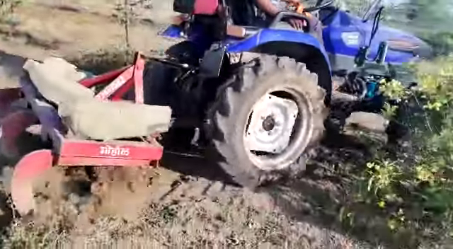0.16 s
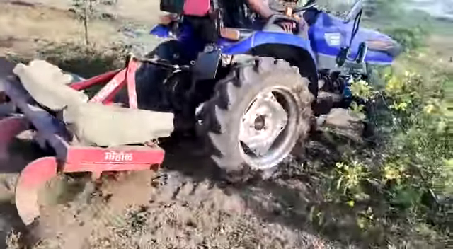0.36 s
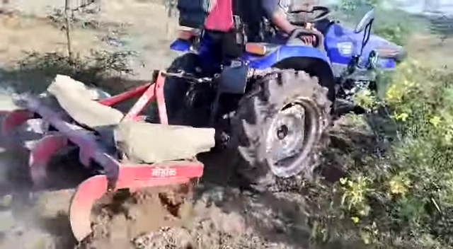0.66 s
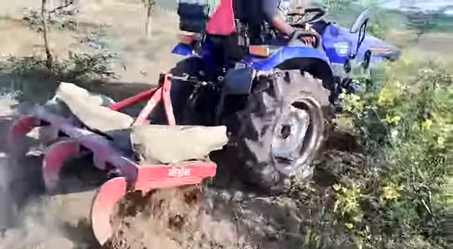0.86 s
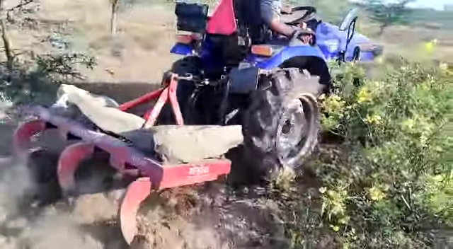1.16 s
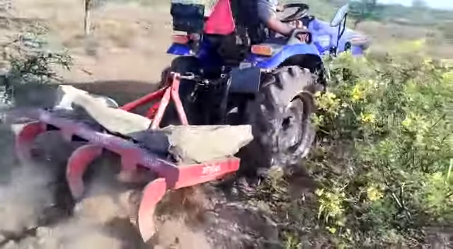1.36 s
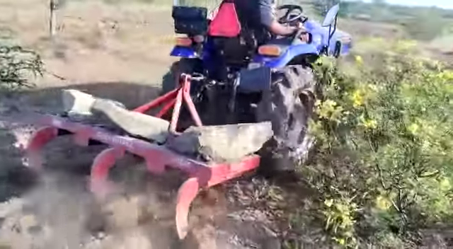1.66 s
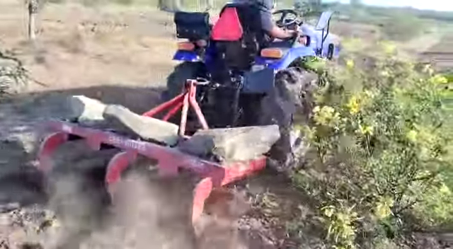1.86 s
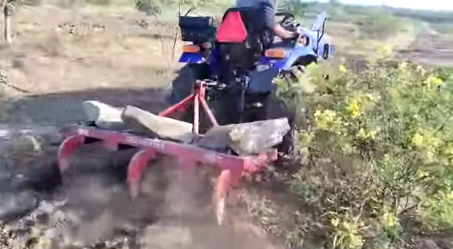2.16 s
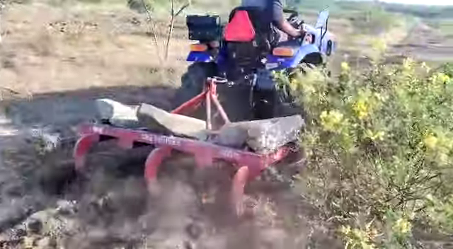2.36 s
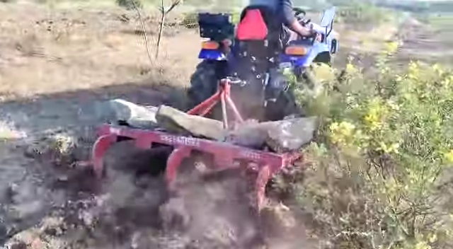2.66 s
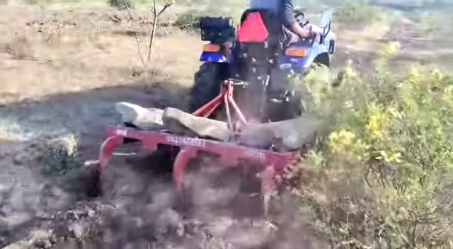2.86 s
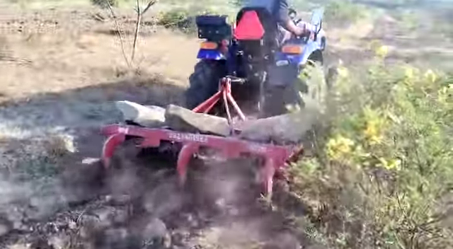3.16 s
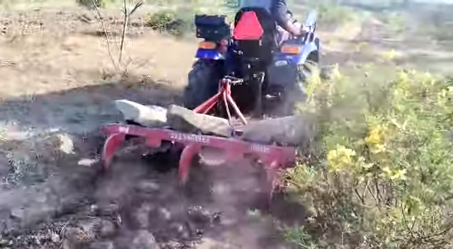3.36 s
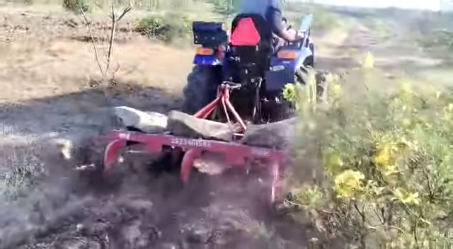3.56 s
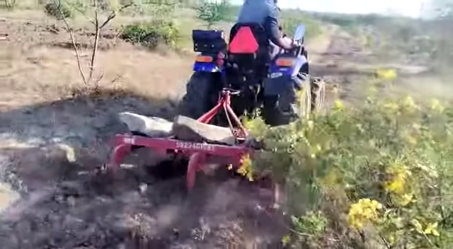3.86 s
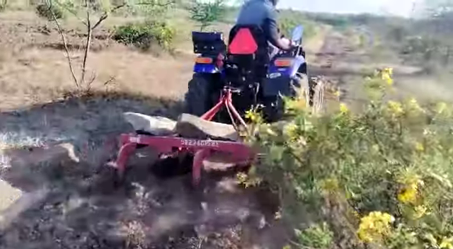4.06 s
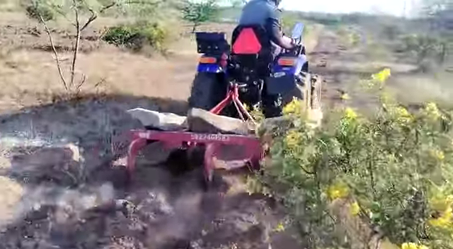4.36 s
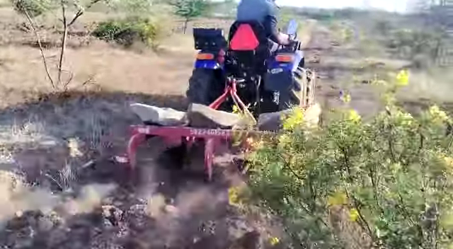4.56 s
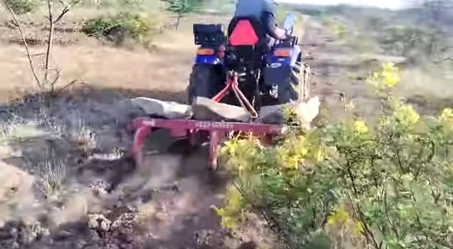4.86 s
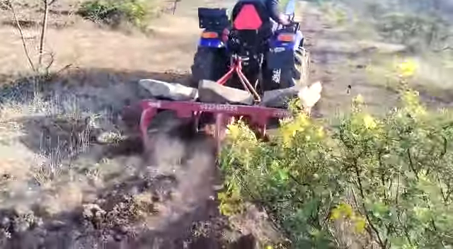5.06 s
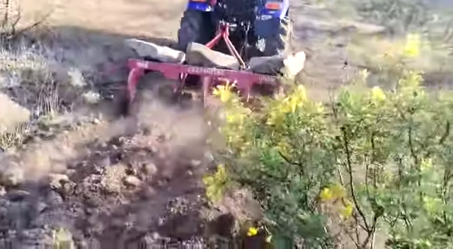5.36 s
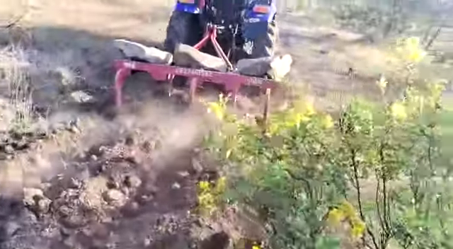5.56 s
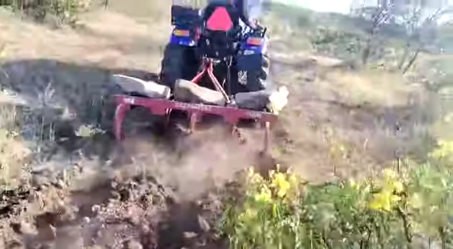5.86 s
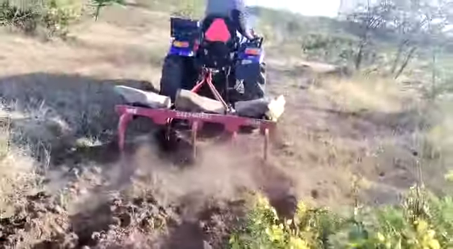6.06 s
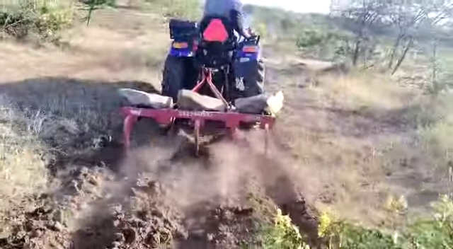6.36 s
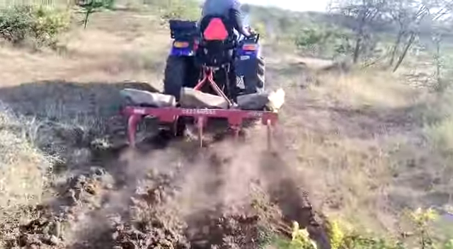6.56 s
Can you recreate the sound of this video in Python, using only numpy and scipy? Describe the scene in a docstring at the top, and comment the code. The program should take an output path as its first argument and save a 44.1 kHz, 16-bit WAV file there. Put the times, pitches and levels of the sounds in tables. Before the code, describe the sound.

Steady diesel chugging with whining gears and metallic rattle draws off across a dry field, with clanking steel, tumbling clods, a bush swish and snapping twigs.

```python
"""Open field, dry soil and scrub: a small diesel tractor starts abreast, 1.92 m off, and drives away with a tine harrow.
From the first second its exhaust beats once a crank turn under gear whine and clatter, while noise and grains
make soil hiss and tumble; the frame first clanks at 0.7 s, as struck modes, and the flank turns away near 2 s.
A bush swishes past at 3.49 s as cracks of twigs and clods, short grain bursts, crowd in; tines scrape stones as
ringing slips from 4.0 to 4.9 s; thumps, damped low notes, come from 1.2 s on, and the frame rattles near 6.06 s."""
import sys
import numpy as np
from scipy import signal
from scipy.fft import rfft, irfft
from scipy.io import wavfile

SR = 44100
rng = np.random.default_rng(int(sys.argv[2]) if len(sys.argv) > 2 else 0)


def waveform_to_disk(signal):
    """Save audio, clipped to [-1, 1], as 16-bit WAV at the path in sys.argv[1]."""
    frames = np.transpose(np.atleast_2d(signal))
    scaled = np.clip(frames, -1, 1) * 32767
    samples = np.round(scaled).astype(np.int16)
    wavfile.write(sys.argv[1], SR, samples)


N = 295470
TIME = np.arange(N) / SR  # s
BINS = np.fft.rfftfreq(N, 1 / SR)  # Hz

# Crank speed, sagging under load. Each row: time in seconds, speed in turns per second.
CRANK_SPEED = [(0.0, 34.45), (0.28, 34.95), (0.53, 35.15), (0.8, 34.1), (0.89, 35.03), (1.15, 34.52),
               (1.35, 34.52), (1.51, 34.2), (1.75, 34.7), (2.14, 35.17), (2.6, 34.9), (2.91, 34.27),
               (3.17, 36.08), (3.42, 35.97), (3.6, 35.56), (3.98, 35.17), (4.06, 33.95), (4.24, 34.0),
               (4.41, 33.5), (4.7, 35.2), (5.21, 35.7), (5.52, 34.74), (5.78, 35.79), (6.18, 34.92),
               (6.45, 35.31), (6.7, 34.85)]
# Engine effort: the governor feeds more fuel as the tines bite. Each row: time in seconds, effort in dB.
ENGINE_EFFORT = [(0, 3), (0.55, -1.5), (0.88, 2.5), (1.06, -3.5), (1.6, 2.5), (2.0, -1.5), (2.45, 0),
                 (3.17, 4), (3.55, 4), (3.92, -2), (4.25, 4), (4.85, 4.5), (5.35, -1), (6.0, -0.5),
                 (6.7, 1)]
# The tractor drives straight off; its flank turns out of sight on the way.
NEAR_M, DRIVE_M_PER_S = 1.92, 0.92
TURN_AWAY_S, TURN_LENGTH_S = 1.97, 0.077
# How a layer carries over the field. Each holds: base level in dB, change in dB per doubling of distance,
# extra level side-on in dB, change in dB per dB of effort.
NOTE_LAW = (-32, 0, 0.36, 0.5)
ROAR_LAW = (-30.5, -2.5, 0.45, 0)
CLATTER_LAW = (-32, -2, 0.3, 0.2)
CRUMBS_LAW = (-43, -3, 1, 0.5)
CLODS_LAW = (-47.5, -7, 9.5, -0.5)

# Exhaust pipe colour. Each row: multiple of the mean crank speed, relative level in dB.
EXHAUST_PIPE = [(1, -28.5), (2, -10), (3, -6.5), (4, -0.5), (5, -4.5), (6, -21), (7, -6.5), (8, -10),
                (9, -10.5), (10, -16), (12, -26), (16, -26.5)]
# Strength of a booming exhaust resonance. Each row: time in seconds, gain in dB.
BOOM_GAIN = [(0, 1), (0.4, 3.5), (0.58, 0), (0.83, 10), (1.1, 2), (1.75, 7.5), (2.1, -12), (2.9, 3),
             (3.5, -3.5), (3.9, -16), (4.3, 1.5), (5.0, -24), (5.9, -31), (6.3, -5), (6.7, -17)]
BOOM_HZ, BOOM_WIDTH_HZ = 243, 18
# Spectrum of the exhaust gas. Each row: frequency in Hz, relative density in dB per Hz.
ROAR_SPECTRUM = [(20, -29), (55, -18), (90, -10), (140, 0.5), (220, 3.5), (330, 0), (470, -0.5), (570, -4),
                 (700, -35), (1200, -65)]
# Spectrum of the engine rattle. Each row: frequency in Hz, relative density in dB per Hz.
CLATTER_SPECTRUM = [(400, -34.5), (630, -4.5), (790, -3), (900, 2.5), (1050, 1.5), (1220, -1.5), (1420, -4),
                    (1680, -9), (1950, -11.5), (2600, -22), (6000, -67)]
# Tones of each gear mesh and of the shafts. Each row: multiple of the crank speed, relative level in dB.
LOWER_MESH = [(25, 0), (24, -14)]
MIDDLE_MESH = [(25.47, 0), (26.1, -8), (24.5, -10)]
UPPER_MESH = [(28, 1), (29, -9.5), (27, -14), (12, -12), (42, -14)]
SHAFT_HUM = [(6.36, 0), (13.33, -5.5), (120.9, -24)]
HUM_DB = -43
# Whine of each mesh, swelling as its teeth take the load. Each row: time in seconds, level in dB.
LOWER_LOAD = [(0, -54), (0.45, -50), (0.55, -38), (1.3, -36.5), (1.7, -37.5), (1.95, -48), (2.35, -48),
              (2.5, -40), (2.62, -50), (3.15, -47), (3.3, -37), (3.55, -35.5), (3.85, -40), (4.0, -48),
              (4.75, -47), (4.87, -37), (5.1, -34.5), (5.5, -40), (5.9, -41), (6.4, -36.5), (6.7, -41)]
MIDDLE_LOAD = [(0, -50), (1.0, -46), (2.0, -41.5), (2.55, -42), (2.75, -35), (2.98, -40), (3.15, -33.5),
               (3.8, -37.5), (4.3, -42), (4.8, -37), (5.15, -37), (5.35, -46), (6.7, -45)]
UPPER_LOAD = [(0, -47), (0.25, -40), (0.6, -33), (0.82, -30), (1.1, -29.5), (1.4, -34.5), (1.7, -31.5),
              (2.0, -37), (2.35, -37), (2.7, -46), (2.95, -43), (3.15, -36), (3.5, -38), (3.9, -43),
              (4.6, -39.5), (5.25, -43), (5.47, -36.5), (5.8, -46), (6.3, -41), (6.7, -41)]
# Ringing of the gearbox case. Each row: frequency in Hz, half-width in Hz, relative level in dB.
CASING_MODES = [(1293, 20, -7), (1427, 46, -13.5)]
# Drone of the engine block. Each row: frequency in Hz, half-width in Hz, relative level in dB.
BLOCK_MODES = [(425, 39, -7), (544, 52, -7)]

# Ringing of the harrow frame. Each row: frequency in Hz, half-width in Hz, relative level in dB.
FRAME_MODES = [(900, 110, 11), (1030, 70, 13), (1230, 95, 12.5), (1750, 300, -7), (2675, 45, -3),
               (3185, 50, -2), (3450, 70, 6.5), (4240, 85, -1), (4660, 150, -2.5), (5320, 115, -2.5),
               (5900, 120, -15), (10700, 940, -18), (13000, 870, -26)]
# The frame jolts on its hitch. Each row: start in seconds, level in dB, chatter length in seconds, treble in dB,
# extra 4-7 kHz in dB, extra top click in dB, note of the struck link in Hz, its level in dB before a 3.5 dB cut,
# its overtone in Hz, overtone level in dB.
CLANKS = [(0.7385, -21.5, 0.015, 4.5, -4.5, -2, 1098, -8.5, 3490, -39),
          (1.5628, -21.5, 0.0091, 3.5, -6, 3.5, 1056, -9.5, 3460, -33),
          (2.515, -23, 0.019, 0.5, -5, 0.5, 1040, -35, 2690, -32),
          (4.135, -21.5, 0.014, 1.5, -1, 1, 956, -16, 3430, -34),
          (4.421, -24, 0.0077, -3, -2, -2, 970, -16, 4210, -37),
          (4.596, -21, 0.017, -2, 0, 1, 970, -25, 5200, -36),
          (4.8058, -19, 0.0091, -3, 7, 2, 956, -12, 5350, -36)]
TAIL_DB, TAIL_DECAY_S, TAIL_RAGGED_DB = -15, .035, 3.5
LINK_RISE_S, LINK_DECAY_S = .002, 0.01
# Twigs and clods break; near 6.06 s the frame rattles briefly. Each row: start in seconds,
# level in dB before colouring, decay time in seconds, hollowness (gain below 4 kHz) in dB,
# top treble in dB, left over right in dB, ring in Hz.
SNAPS_AND_RATTLE = [(0.885, -43.5, 0.046, 4.5, -13, -3, 5000), (1.395, -38.5, 0.044, 3, -9, 1, 4770),
                    (2.409, -44, 0.064, -5, -9, 0, 3270), (2.591, -42.5, 0.0034, 6, -6, 10, 1810),
                    (3.464, -27.5, 0.0047, -11, -5, -1, 5300), (3.502, -25, 0.0035, -3.5, -2, 0, 5270),
                    (3.616, -34, 0.012, -14, -2, -4, 5270), (3.7298, -23, 0.0023, -10, 0, -7, 5230),
                    (4.026, -45.5, 0.073, 1, -6, -3, 3400), (4.195, -40.5, 0.057, -6, -17, 4, 3400),
                    (4.849, -33, 0.004, -5, -16, 0, 3920), (4.972, -41.5, 0.0056, -5, 4, -6, 5300),
                    (5.120, -40, 0.0035, -17, -6, -7, 5280), (5.169, -29, 0.001, -2.5, -16, 15, 1805),
                    (5.2366, -34.5, 0.0081, -20, 1.5, -5, 4760),
                    (5.3532, -19.5, 0.001, -7.5, -12, 21.5, 1880), (5.695, -48, 0.027, 2.5, -10, -7, 2490),
                    (5.780, -45, 0.00093, -9, 8, -15, 5300), (6.054, -36, 0.016, -2, -11, 0, 6000),
                    (6.068, -38, 0.015, -0.5, -21, -2, 5150), (6.283, -44, 0.0076, -11, 9, -3, 13400),
                    (6.564, -41, 0.0076, -4.5, -22, -3, 4260), (6.648, -43, 0.017, -2, -19, -4, 3400)]
# Spectrum of the snaps and the rattle. Each row: frequency in Hz, gain in dB.
SNAP_SPECTRUM = [(600, 3), (1500, 9.5), (3000, 6), (4200, 6), (5300, 2.5), (6300, -5), (7300, -12.5),
                 (9000, -9), (11200, 1.5), (14000, -15), (16000, -22)]
SNAP_RING_DB, SNAP_RING_WIDTH_HZ = 6.5, 130
GRIT_PER_S, GRIT_SHARE, CRACKLE_DB = 800, .65, 3.5
FIRST_CRACK_S = 0.0011  # the shorter the decay, the more the first crack stands out
# Clods bump the frame. Each row: start in seconds, level in dB, pitch in Hz, decay time in seconds.
THUMPS = [(1.203, -18, 320.2, 0.0091), (1.573, -24, 348, 0.029), (2.638, -18, 350, 0.0079),
          (3.135, -20, 322, 0.022), (4.88, -26.5, 312, 0.041), (5.455, -22, 337, 0.016),
          (5.727, -21, 367, 0.014)]
# Ringing of a tine. Each row: frequency in Hz, half-width in Hz, relative level in dB.
TINE_MODES = [(1240, 50, 1), (1890, 115, -2), (2900, 140, -18), (3380, 110, -15), (4220, 170, -8.5),
              (5100, 350, -19)]
# The tine scrapes over stones. Each row: start in seconds, length in seconds, peak pressure in dB.
SCRAPES = [(4.007, 0.083, -38.5), (4.173, 0.14, -36.5), (4.297, 0.14, -44), (4.465, 0.1, -30.5),
           (4.687, 0.23, -42)]
SQUEAL_S, SQUEAL_LENGTH_S, SQUEAL_DB = 4.515, 0.013, -39
SQUEAL_HZ, SQUEAL_WIDTH_HZ = 4135, 45

# Spectrum of sliding crumbs. Each row: frequency in Hz, relative density in dB per Hz.
CRUMB_SPECTRUM = [(600, -16.5), (1700, 7.5), (2400, -0.5), (2800, 9.5), (3450, 6.5), (3750, 7), (4200, 8),
                  (5300, 3.5), (6100, -3), (7000, -20), (9000, -17), (11000, -9), (13000, -20),
                  (15000, -51), (16000, -44)]
# Spectrum of rolling clods. Each row: frequency in Hz before the pitch ratio, relative density in dB per Hz.
CLOD_SPECTRUM = [(700, -8.5), (1100, 0.5), (1450, 6.5), (1700, -8.5), (2000, 1), (2400, -8), (3200, -8),
                 (4200, -22), (7000, -53.5)]
CRUMBS_PER_S, CRUMB_SPREAD_DB = 600, 2.5
# Swells of heaved soil; at 3.49 s a bush swishes past, hiss only. Each row: peak in seconds,
# half-length in seconds, tumble of clods in dB, hiss in dB, pitch of the tumble as a ratio.
SWELLS = [(0.171, 0.5, -33, -54, 1.026), (1.48, 0.11, -31, -52, 1.05), (2.752, 0.11, -42.5, -65, 1.09),
          (3.49, 0.18, -73, -44.5, 0.88), (4.231, 0.063, -44, -54, 1), (4.532, 0.32, -45, -49.5, .93),
          (5.261, 0.17, -43, -46, 0.96), (5.868, 0.26, -44.5, -76, 1.02)]
# Lowest pitch that the ground echo weakens. Each row: time in seconds, frequency in Hz.
GROUND_DIP = [(0, 694), (1.7, 654), (2.3, 576), (3.2, 568), (4.0, 596), (5.05, 560), (5.55, 655),
              (6.0, 690), (6.7, 570)]
# Likeness of the two microphone ports. Each row: frequency in Hz, left-right correlation from -1 to 1.
PORT_LIKENESS = [(60, 0.93), (400, 1), (900, 0.88), (1400, 0.84), (2300, -0.4), (6000, -0.0096),
                 (15000, 0.054)]
CROSSOVER_HZ, OVERLAP_HZ, TREBLE_LEAD_S = 6450, 520, .00513
EDGE_HZ = 15650


def exhaust(turns):
    """One pressure pulse a turn rings the pipe; no two firings are equally strong."""
    multiple, db = np.transpose(EXHAUST_PIPE)
    pipe_hz = multiple * np.mean(curve(CRANK_SPEED))
    pipe = causal(read(np.column_stack([pipe_hz, db]), BINS))
    pulses = -sum(np.cos(2 * np.pi * k * (turns - .045)) for k in range(1, 17))
    note = unit(shaped(pulses * amp(0.5 * wander(29)), pipe))
    resonance = np.exp(-((BINS - BOOM_HZ) / BOOM_WIDTH_HZ) ** 2)
    boom = shaped(note, resonance) * amp(curve(BOOM_GAIN))
    return (note + boom) * loudness(*NOTE_LAW)


def roar(turns):
    """Turbulent gas puffs out with each pulse, some puffs harder than others."""
    burst = np.exp(-((turns + .02) % 1) / .17) * amp(3 * wander(30))
    puffs = rng.standard_normal((2, N)) * (1 + .4 * burst)
    return unit(shaped(ports(puffs), amp(read(ROAR_SPECTRUM, BINS)))) * loudness(*ROAR_LAW)


def clatter(turns):
    """Valve gear and injection rattle the block in step with the crank."""
    knocks = grains(per_s=1400, spread_db=-1.0) + 0.76 * rng.standard_normal((2, N))
    knocks *= throb(turns, at=0.72, depth_db=0.6)
    sound = unit(shaped(ports(knocks), causal(read(CLATTER_SPECTRUM, BINS))))
    return sound * loudness(*CLATTER_LAW) * amp(1.23 * wander(11.0))


def gears(turns, mesh, load_db, backlash, flutter_db):
    """Meshing teeth whine at multiples of the crank speed; backlash (in turns) blurs the high tones most."""
    shaft = turns + backlash * wander(10)
    tones = np.zeros(N)
    for multiple, db in mesh:
        level = amp(db + flutter_db * wander(33))
        tones += level * np.sin(2 * np.pi * (multiple * shaft + rng.random()))
    return np.sqrt(2) * tones * amp(load_db)


def casing():
    """Tooth rattle rings the gearbox case with the upper mesh's load, loudest while the flank faces us."""
    ring = unit(shaped(rng.standard_normal(N), body(CASING_MODES)))
    return ring * np.hypot(amp(curve(UPPER_LOAD) - 18.5), amp(-43.5) * side_on())


def block():
    """The engine block drones in its modes, fading from the start as the big wheel hides it."""
    drone = unit(shaped(rng.standard_normal(N), body(BLOCK_MODES)))
    return drone * amp(-29.5) * np.exp(-TIME / 0.45)


def clanks():
    """Loose steel strikes once and chatters; the frame rings and the struck link adds a note and overtone."""
    frame, out, links = body(FRAME_MODES), np.zeros((2, N)), np.zeros((2, N))
    treble = np.clip(BINS / 1500 - 1, 0, 1)
    high = np.interp(BINS, [3600, 4600, 6500, 8000], [0, 1, 1, 0])
    click = np.interp(BINS, [6500, 8000], [0, 1])
    age = TIME[:SR // 6]
    bounces = amp(TAIL_DB + TAIL_RAGGED_DB * wander(110))
    for s, db, length, treble_db, high_db, click_db, link_hz, link_db, over_hz, over_db in CLANKS:
        tail = bounces[round(s * SR):][:len(age)] * np.exp(-age / TAIL_DECAY_S)
        chatter = (np.exp(-(age / length) ** 4) + tail) * rng.standard_normal((2, len(age)))
        chatter /= np.linalg.norm(chatter, axis=1, keepdims=True)
        strike = [[.5], [0]] * (age == 0)  # only in the part that both ports share
        colour = amp(treble_db * treble + high_db * high + click_db * click)
        ring = short_filter(chatter + strike, frame * colour)
        ring /= np.linalg.norm(ring, axis=1, keepdims=True)
        add(out, s, ring * np.sqrt(length * SR) * amp(db))
        add(links, s, amp(link_db - 3.5) * struck(link_hz, LINK_RISE_S, LINK_DECAY_S))
        overtone = amp(over_db) * struck(over_hz, LINK_RISE_S, LINK_DECAY_S)
        add(links, s, placed(overtone, left_db=-1))
    lean_right = amp((treble - .8 * click) * np.array([[-2.7], [2.7]]))
    return shaped(ports(out), lean_right) + links


def snaps_and_rattle():
    """A crack and a burst of tiny ones ring a breaking twig (bright) or clod (hollow), or rattle the frame."""
    out = np.zeros((2, N))
    # doubled end to end, so that late bursts find enough of it
    crackle = np.tile(amp(CRACKLE_DB * wander(330)), 2)
    grit = np.tile(grains(per_s=GRIT_PER_S, spread_db=1.5), 2)
    lead_in = .01  # s of silence ahead of the crack
    age = TIME[:SR // 5] - lead_in
    for s, db, decay, hollow_db, top_db, pan_db, ring_hz in SNAPS_AND_RATTLE:
        start = round(s * SR)
        burst = (1 - GRIT_SHARE) * rng.standard_normal((2, len(age)))
        burst += GRIT_SHARE * grit[:, start:][:, :len(age)]
        burst *= np.exp(-abs(age) / decay) * (age >= 0)
        burst *= crackle[start:][:len(age)]
        burst /= np.linalg.norm(burst, axis=1, keepdims=True)
        burst[:, round(lead_in * SR)] += FIRST_CRACK_S / decay
        burst *= np.sqrt(decay * SR / 2) / np.linalg.norm(burst, axis=1, keepdims=True) * amp(db)
        colour = np.interp(BINS, [3500, 4800, 6000, 7000], amp([hollow_db, 0, 0, top_db]))
        colour *= 1 + amp(SNAP_RING_DB) / (1 + ((BINS - ring_hz) / SNAP_RING_WIDTH_HZ) ** 2)
        add(out, s - lead_in, placed(short_filter(burst, colour), pan_db))
    return amp(2.5) * shaped(out, causal(read(SNAP_SPECTRUM, BINS)))


def thumps():
    """Heavy clods bump the frame with a dull, short note."""
    out = np.zeros((2, N))
    for s, db, hz, decay in THUMPS:
        add(out, s, amp(db) * struck(hz, rise_s=0.0048, decay_s=decay))
    return out


def scrapes():
    """Quick slips of steel on stone ring a tine, wavering as it bends; at the hardest push it squeals."""
    pressure = np.zeros(N)
    for s, length, db in SCRAPES:
        arch = np.sqrt(np.maximum(1 - (2 * (TIME - s) / length - 1) ** 2, 0))
        pressure += amp(db) * arch
    slips = ports(grains(per_s=600, spread_db=1.0))
    squeal = unit(shaped(slips, body([(SQUEAL_HZ, SQUEAL_WIDTH_HZ, 0)])))
    squeal *= np.exp(-((TIME - SQUEAL_S) / SQUEAL_LENGTH_S) ** 2)
    ring = unit(shaped(slips, body(TINE_MODES))) * pressure + squeal * amp(SQUEAL_DB)
    bent = TIME + .00008 * wander(30)  # uneven reading of time wavers the pitch
    return np.array([np.interp(bent, TIME, port) for port in ring]) * amp(1.0 * wander(70))


def soil_and_bush(turns):
    """Dry crumbs slide and larger clods tumble, shaken by the engine's beat; a bush swells the hiss once."""
    tumble_swells, hiss_swells = swells()
    crumbs = rng.standard_normal((2, N)) + 0.5 * grains(per_s=CRUMBS_PER_S, spread_db=CRUMB_SPREAD_DB)
    hiss = unit(shaped(ports(crumbs), causal(read(CRUMB_SPECTRUM, BINS)))) * amp(1.48 * wander(24))
    hiss *= np.hypot(loudness(*CRUMBS_LAW), hiss_swells)
    lumps = rng.standard_normal((2, N)) + 0.58 * grains(per_s=270, spread_db=0.0)
    tumble = unit(shaped(ports(lumps), causal(read(CLOD_SPECTRUM, BINS)))) * amp(2.0 * wander(21))
    # big clods knock lower than small ones: read the tumble slower or faster
    pace = np.cumsum(curve([(s, pitch) for s, *_, pitch in SWELLS])) / SR
    tumble = np.array([np.interp(pace % TIME[-1], TIME, port) for port in tumble])
    tumble *= np.hypot(loudness(*CLODS_LAW), tumble_swells)
    return (hiss + tumble) * throb(turns, at=0.52, depth_db=1.25)


def swells():
    """Gains of the tumble and the hiss, rising and falling smoothly with heaved soil or the passing bush."""
    s, length, *levels_db, _ = np.transpose(SWELLS)
    shapes = np.exp(-((TIME - s[:, None]) / length[:, None]) ** 2)
    return amp(levels_db) @ shapes


def ground(x):
    """The ground echo weakens one pitch and its third multiple; the dips glide as the path changes."""
    dip_hz = curve(GROUND_DIP)
    lowest_dip = notch(x, dip_hz, width_hz=146, floor_db=-9.0)
    return notch(lowest_dip, 3 * dip_hz, width_hz=430, floor_db=-5.5)


def side_on():
    """1 while the flank of the tractor faces the listener, 0 once it has turned away."""
    return (1 - np.tanh((TIME - TURN_AWAY_S) / TURN_LENGTH_S)) / 2


def loudness(base_db, distance_db, side_db, effort_share):
    """Gain of a layer, set by its distance, the flank's facing and the engine's effort."""
    doublings = np.log2(np.hypot(NEAR_M, DRIVE_M_PER_S * TIME) / NEAR_M)
    facing_db = side_db * side_on()
    return amp(base_db + distance_db * doublings + facing_db + effort_share * curve(ENGINE_EFFORT))


def ports(pair):
    """Two microphone ports hear nearly the same bass, partly opposed sound near 2.3 kHz, unrelated treble."""
    same = np.clip(read(PORT_LIKENESS, BINS), -1, 1)
    mid = shaped(pair[0], np.sqrt((1 + same) / 2))
    side = shaped(pair[1], np.sqrt((1 - same) / 2))
    return np.array([mid + side, mid - side])


def placed(x, left_db):
    """Leans a sound left, or right if negative, by a level difference between the ports."""
    return x * amp([[left_db / 2], [-left_db / 2]])


def grains(per_s, spread_db):
    """Tiny impacts at random moments, their sizes spread by chance, scaled to rms 1."""
    size = amp(spread_db * np.minimum(rng.exponential(1, (2, N)), 4))
    sign = rng.choice([-1, 1], (2, N))
    return unit(size * sign * (rng.random((2, N)) < per_s / SR))


def struck(hz, rise_s, decay_s):
    """One damped mode, set going by a soft blow."""
    age = TIME[:SR // 5]
    swing = np.sin(2 * np.pi * hz * age)
    return swing * (1 - np.exp(-age / rise_s)) * np.exp(-age / decay_s) * np.ones((2, 1))


def throb(turns, at, depth_db):
    """A swell once a cycle, peaking at the given share of it."""
    return amp(depth_db * np.cos(2 * np.pi * (turns - at)))


def wander(rate_hz):
    """Slow smooth chance of rms 1, from noise below about the given rate."""
    slow = BINS[BINS < 3 * rate_hz]
    spectrum = rng.standard_normal((len(slow), 2)) @ [1, 1j] * np.exp(-(slow / rate_hz) ** 2)
    return unit(irfft(spectrum, N))


def body(modes):
    """Frequency response of a set of damped modes, dark between them."""
    peaks = sum(amp(db) / (1 + ((BINS - hz) / width) ** 2) for hz, width, db in modes)
    return causal(20 * np.log10(1e-4 + peaks))


def causal(db):
    """The response with these levels that starts sharply and rings afterwards (minimum phase)."""
    log_gain = irfft(np.log(amp(db)), N)
    fold = 1 + np.sign(N / 2 - np.arange(N))  # moves the half before time zero to after it
    return np.exp(rfft(log_gain * fold - log_gain[0] * (np.arange(N) == 0)))


def notch(x, hz, width_hz, floor_db):
    """A dip in the spectrum that follows a curve: shift to zero, smooth, shift back, subtract."""
    turn = np.exp(2j * np.pi * np.cumsum(hz) / SR)
    r = np.exp(-np.pi * width_hz / SR)
    band = 2 * (turn * signal.lfilter([1 - r], [1, -r], x / turn)).real
    return x - (1 - amp(floor_db)) * band


def shaped(x, gain):
    """Filters x by a gain for each frequency."""
    return irfft(rfft(x) * gain, N)


def short_filter(x, gain):
    """Filters a brief sound by a gain given on the full frequency axis."""
    hz = np.fft.rfftfreq(x.shape[-1], 1 / SR)
    return irfft(rfft(x) * np.interp(hz, BINS, gain), x.shape[-1])


def add(mix, s, sound):
    """Mixes a sound in at a time in seconds."""
    part = mix[:, round(s * SR):][:, :sound.shape[1]]
    part += sound[:, :part.shape[1]]


def curve(rows):
    """A control curve at every sample."""
    return np.interp(TIME, *np.transpose(rows))


def read(points, hz):
    """A spectrum on a log-frequency axis."""
    f, value = np.transpose(points)
    return np.interp(np.log(hz + 1), np.log(f + 1), value)


def amp(db):
    """Decibels to gain."""
    return 10 ** (np.asarray(db) / 20)


def unit(x):
    """Scales to rms 1."""
    return x / np.sqrt(np.mean(x ** 2) + 1e-20)


def scene():
    """The tractor and its harrow in an open field; engine, soil and bush also reach us off the ground."""
    turns = np.cumsum(curve(CRANK_SPEED)) / SR
    meshes = (LOWER_MESH, LOWER_LOAD), (MIDDLE_MESH, MIDDLE_LOAD), (UPPER_MESH, UPPER_LOAD)
    whine = sum(gears(turns, mesh, curve(load), backlash=0.00084, flutter_db=2) for mesh, load in meshes)
    hum = gears(turns, SHAFT_HUM, HUM_DB, backlash=0.0059, flutter_db=2.5)
    engine = placed(exhaust(turns) + roar(turns) + block() + hum, left_db=-0.76)
    engine += placed(clatter(turns) + whine + casing(), left_db=1.1)
    harrow = clanks() + snaps_and_rattle() + thumps() + placed(scrapes(), left_db=3.0)
    return ground(engine + placed(soil_and_bush(turns), left_db=-1.5)) + harrow


def record(dry):
    """The top treble arrives a few milliseconds early, rippling where the bands overlap; then the band limit."""
    upper = (1 + np.tanh((BINS - CROSSOVER_HZ) / OVERLAP_HZ)) / 2
    lead = 1 - upper + upper * np.exp(2j * np.pi * BINS * TREBLE_LEAD_S)
    band_limit = signal.firwin(511, EDGE_HZ, window=("kaiser", 9), fs=SR)
    return signal.oaconvolve(shaped(dry, lead), band_limit[None], "same")


dry = scene()
out = record(dry)
waveform_to_disk(out)
```